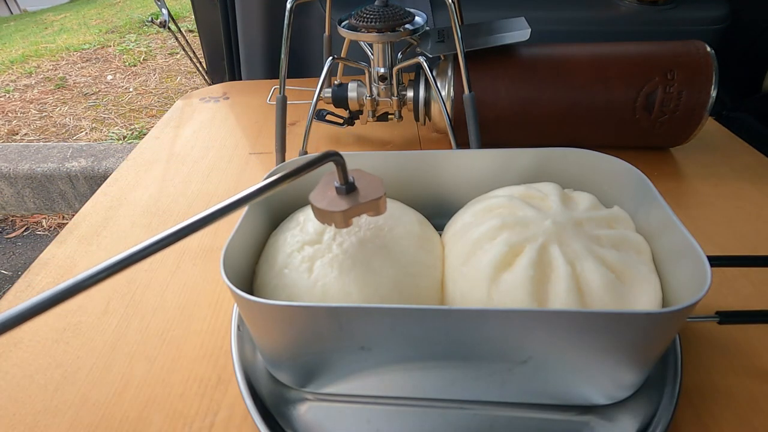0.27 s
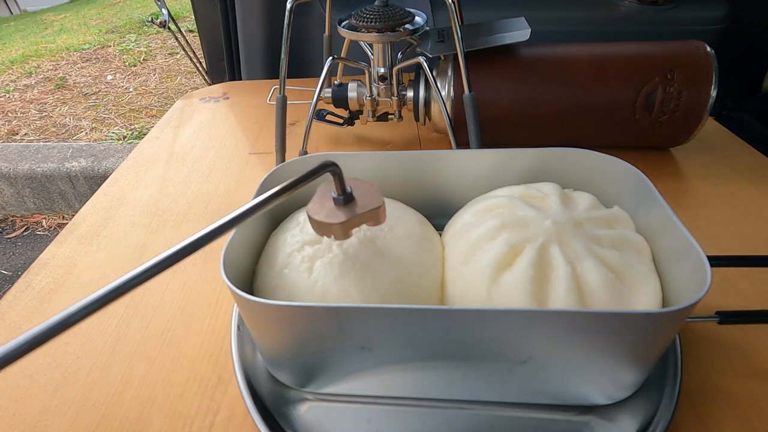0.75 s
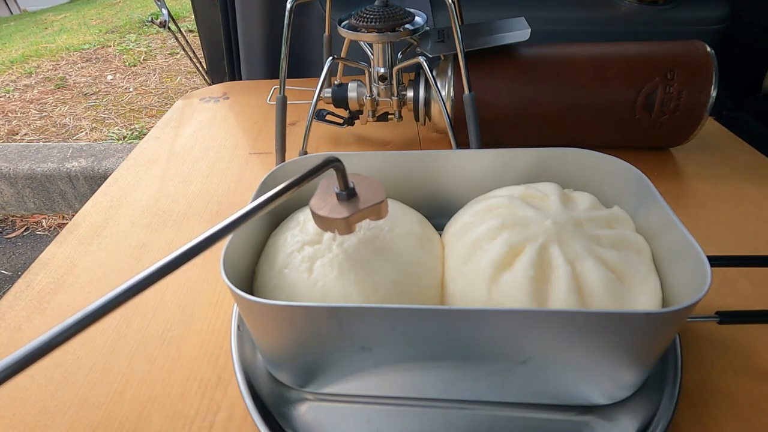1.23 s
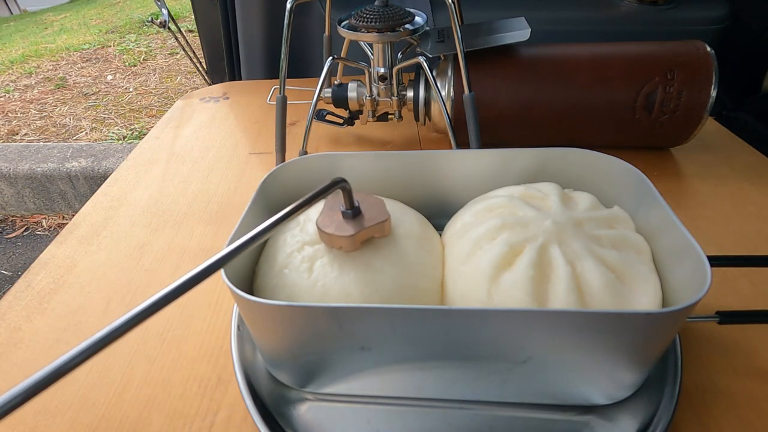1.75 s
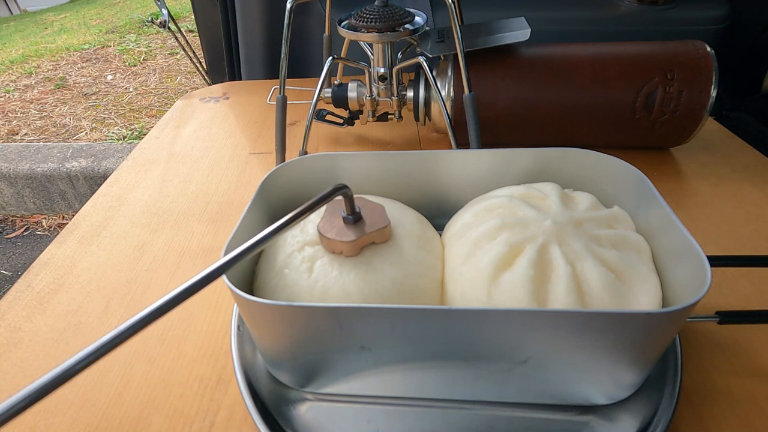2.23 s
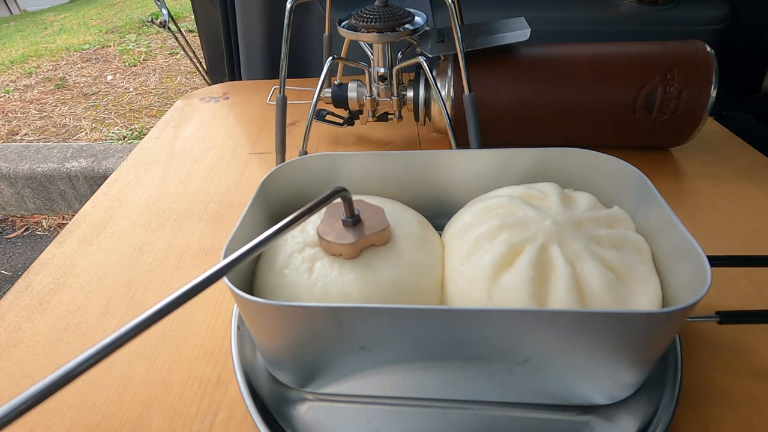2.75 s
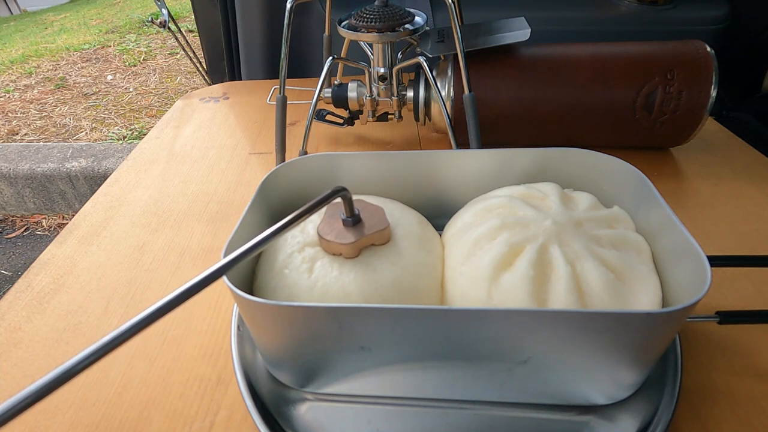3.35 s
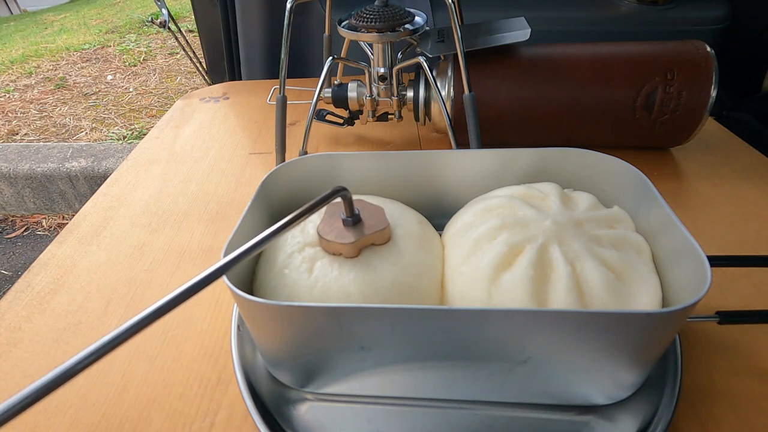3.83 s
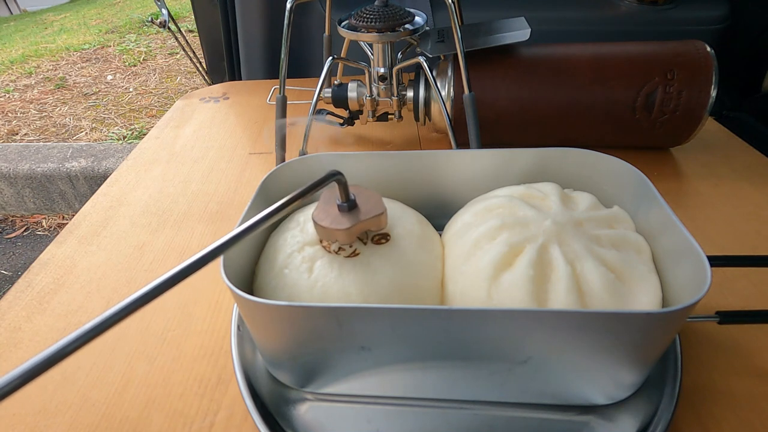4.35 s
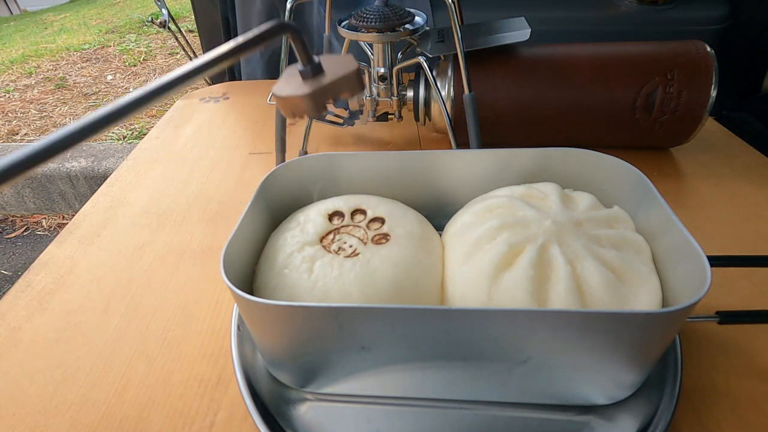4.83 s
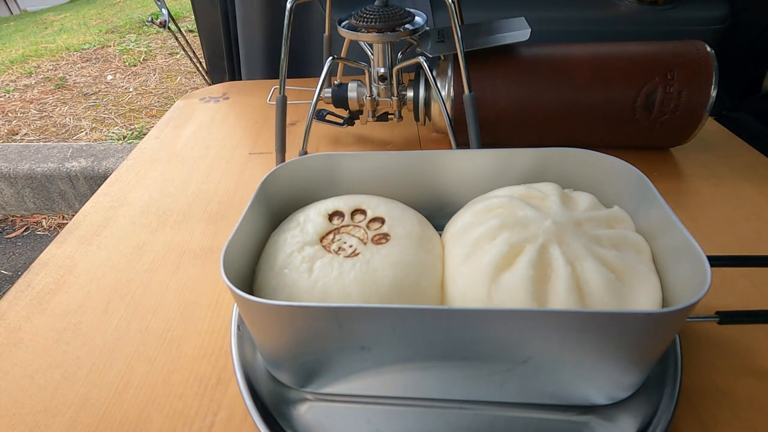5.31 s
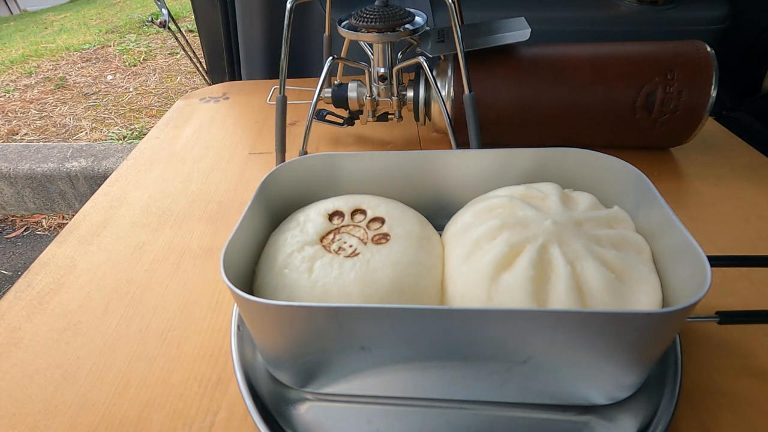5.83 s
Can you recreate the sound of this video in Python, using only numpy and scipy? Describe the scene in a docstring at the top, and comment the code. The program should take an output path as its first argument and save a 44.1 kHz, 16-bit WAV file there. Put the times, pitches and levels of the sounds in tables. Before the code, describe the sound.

Outdoors, wind rumbles softly on the microphone. Close by, a hot branding iron touches a steamed bun and a dense, bright sizzle swells, full of tiny pops. It thins into uneven spurts and spits, then stops abruptly as the iron lifts. The wind carries on, with a faint bird whistling far off and a thin insect shrill behind it.

```python
"""Wind rumbles on the microphone, outdoors; far off a bird whistles and an insect shrills.
Close by, just left of centre, a hot branding iron is pressed onto a steamed bun in a tin.
Moisture flashes to steam under it: a dense fizz of tiny pops that thins into spurts as the
crust dries, and stops when the iron lifts. The bird sings again over the wind."""
import sys
import numpy as np
from scipy import signal
from scipy.fft import rfft, irfft, next_fast_len
from scipy.io import wavfile
from scipy.ndimage import uniform_filter1d

SR = 44100
rng = np.random.default_rng(int(sys.argv[2]) if len(sys.argv) > 2 else 0)


def int16_out(signal):
    """Quantize to a 16-bit WAV file."""
    q = np.round(np.clip(np.atleast_2d(signal).T, -1, 1) * 32767)
    wavfile.write(sys.argv[1], SR, q.astype(np.int16))


N = 267687
TIME = np.arange(N) / SR
FFT_SIZE = next_fast_len(N + 8192)
FREQS = np.maximum(np.fft.rfftfreq(FFT_SIZE, 1 / SR), 1)


def sizzle(sputter_db=5.5, sputter_hz=110, dry_snap_db=-16):
    """The bun, close to the microphone: moisture bursts into steam as ticks, puffs and fine spray."""
    flow = from_db(boil_db() + sputter_db * dryness() * drift(sputter_hz))   # drier skin boils unevenly
    pops = droplets()
    snaps = np.sign(pops) * np.abs(pops) ** 0.54   # the same pops, more alike in size
    boiling = bursts(burst_rate(), spread_db=8.5)
    spray = searing_spray(flow, snaps)
    treble = pocket_ticks(boiling * flow + pops * from_db(6.3)) + spray
    treble += pops * dryness() * from_db(dry_snap_db)   # droplets snap more brightly on a dry crust
    body = steam_puffs(boiling, flow, snaps) + touch_and_spits()
    # tin and table throw the bursts back
    return from_the_left(scatter(treble, t60=0.04, wet_db=-15.5)) + scatter(body, t60=0.03, wet_db=-8)


# The boil builds as the iron is pressed home, ebbs as the crust dries, ends at the lift: t/s, level/dB
BOIL_LEVEL = [(1.862, -58), (2.0, -51.5), (2.12, -43), (2.199, -37.5), (2.43, -32.5), (3.0, -36.5),
              (3.638, -40), (3.8, -45.5), (4.165, -43.5), (4.222, -72)]
# Trapped steam escaping round the rim: t/s, level/dB
RIM_SPURTS = [(2.045, -43.5), (2.295, -38), (2.716, -37), (2.82, -38), (2.858, -43), (3.005, -34),
              (3.08, -33), (3.153, -39.5), (3.374, -43), (3.472, -34.5), (3.59, -40), (3.625, -38),
              (3.66, -35), (3.768, -41), (3.859, -37.5), (4.02, -48), (4.147, -40)]
# Brief stalls of the boil: t/s, dip/dB
BOIL_STALLS = [(2.122, -8), (2.582, -9), (2.77, -8), (2.967, -6), (3.063, -14), (3.19, -6), (3.241, -15),
               (3.4, -6.5), (3.505, -1), (3.56, -3), (3.738, -3), (3.811, -6), (3.94, -3), (3.98, -4),
               (4.089, -3)]

def boil_db(spurt_s=0.012, stall_s=0.0086):
    """Level of the boil while the iron touches, with its spurts and stalls."""
    touching = (TIME > BOIL_LEVEL[0][0]) & (TIME < BOIL_LEVEL[-1][0])
    level_db = 20 * np.log10(with_surges(in_time(BOIL_LEVEL)[0], RIM_SPURTS, spurt_s))
    dips_db = sum(db * bell(s, stall_s) for s, db in BOIL_STALLS)
    return np.where(touching, level_db + dips_db, -200)


# Tiny bursts on the wet skin, thinning as it dries: t/s, rate/(1/s)
BURST_RATE = [(1.85, 600), (2.3, 4600), (2.75, 2680), (3.1, 1730), (3.7, 1050), (4.2, 700)]

def burst_rate():
    """Bursts per second under the iron."""
    return in_time(BURST_RATE)[0]


def wetness():
    """The burst rate as a share of its peak."""
    return burst_rate() / burst_rate().max()


def dryness():
    """0 until the bursts are densest, then towards 1 as they thin out."""
    return (1 - wetness()) * (TIME > TIME[np.argmax(wetness())])


def bursts(per_s, spread_db):
    """Random clicks of uneven size; they share the available steam, so their power stays near 1."""
    born = rng.random(N) < per_s / SR
    size_db = spread_db * np.minimum(rng.standard_normal(N), 1.8)
    clicks = born * rng.choice([-1, 1], N) * from_db(size_db)
    local_power = np.abs(uniform_filter1d(clicks ** 2, size=900))
    return clicks / np.sqrt(local_power + 1e-3)


# The sharp tick of a burst, heard close: f/Hz, relative level/dB
TICK_SPECTRUM = [(1500, -48.5), (3800, -27), (5100, -5.5), (5750, -9.5), (6500, -0.5), (6850, -2),
                 (7400, 2.5), (8150, -5), (8750, -5), (9400, -11), (9850, -11.5), (11000, -26),
                 (12400, -28), (13000, -25), (14300, -27), (16500, -41)]

def pocket_ticks(clicks, low_hz=6300, high_hz=9500, ring_db=7.0, width_octaves=0.64, pockets=8):
    """Each burst rings briefly at the pitch of its own steam pocket."""
    pocket_of, ticks = rng.integers(0, pockets, N), np.zeros(N)
    for pocket, hz in enumerate(np.geomspace(low_hz, high_hz, pockets)):
        resonance_db = ring_db / (1 + (np.log2(FREQS / hz) / width_octaves) ** 2)
        ticks += coloured(clicks * (pocket_of == pocket), at_hz(TICK_SPECTRUM) + resonance_db)
    return ticks


# The softer puff of a burst's steam: f/Hz, relative level/dB
PUFF_SPECTRUM = [(200, -3), (450, 2), (830, -5), (1000, -3.5), (1450, 2.5), (1850, -2), (2500, 1.5),
                 (3300, 1), (4000, -1), (5300, 5), (8000, -25), (14000, -19.5)]

def steam_puffs(boiling, flow, snaps):
    """Steam leaves each burst; puffs grow more slowly than ticks, so they stand out in a gentle boil."""
    puffs = boiling * flow ** 0.74 * wetness() ** 0.037 * from_db(-19.5)
    return coloured(puffs + snaps * from_db(-22.5), at_hz(PUFF_SPECTRUM))


# The finest spray, right under the iron: f/Hz, relative level/dB
SPRAY_SPECTRUM = [(3500, -16.5), (4900, -9), (5800, -5), (6500, -1), (7300, -7.5), (8150, 0.5), (8800, 1),
                  (9400, 0), (9900, -2), (11100, -12.5), (12400, -14.5), (13000, -20), (14300, -16.5),
                  (16500, -55)]

def searing_spray(flow, snaps):
    """Metal sears the skin into a mist of tiny bursts, with a crack from each droplet."""
    mist = bursts(2 * burst_rate(), spread_db=6.0)
    spray = mist * flow ** 0.49 * wetness() ** 0.09 * from_db(-27.5)
    return coloured(spray + snaps * from_db(-12), at_hz(SPRAY_SPECTRUM))


# The loudest droplets bursting, from first touch to lift: t/s, relative level/dB
LOUD_DROPLETS = [(1.8697, -27), (1.9935, -30), (2.0412, -27), (2.1355, -25), (2.1843, -15), (2.192, -19),
                 (2.208, -17), (2.2829, -18), (2.2992, -16), (2.3243, -18), (2.3908, -15), (2.4112, -15),
                 (2.4392, -16), (2.465, -14), (2.4771, -17), (2.4834, -13), (2.525, -16), (2.5932, -17),
                  (2.6962, -13), (2.7152, -16), (2.7263, -15), (2.7378, -17), (2.8111, -16), (2.8173, -17),
                 (2.8407, -14), (2.8676, -14), (2.8902, -14), (2.9076, -15), (2.983, -16), (2.989, -11),
                 (3.0012, -16), (3.0118, -15), (3.0206, -12), (3.0406, -12), (3.0764, -19), (3.1088, -13),
                 (3.1135, -18), (3.1441, -13), (3.1655, -18), (3.2159, -17), (3.3117, -11), (3.3297, -18),
                 (3.369, -16), (3.382, -15), (3.4072, -19), (3.4267, -17), (3.4451, -18), (3.4648, -15),
                 (3.4771, -16), (3.4922, -14), (3.5186, -17), (3.5466, -14), (3.5708, -16), (3.578, -13),
                 (3.5872, -15), (3.5956, -15), (3.6175, -12), (3.6261, -15), (3.6371, -15), (3.6477, -19),
                 (3.6677, -15), (3.6978, -17), (3.7618, -17), (3.7667, -15), (3.7737, -17), (3.8284, -14),
                 (3.8373, -15), (3.8539, -18), (3.8635, -19), (3.8875, -20), (3.9157, -13), (3.9248, -17),
                 (3.9522, -18), (4.0019, -17), (4.013, -19), (4.0342, -20), (4.0563, -19), (4.0726, -21),
                 (4.1271, -22), (4.151, -21), (4.1656, -19), (4.2343, -31), (4.2631, -33)]

def droplets():
    """Each droplet cracks once, then gives two smaller ticks within two milliseconds."""
    clicks, sizes_db = np.zeros(N), np.array([0, -11, -15])
    delays_s = rng.uniform([0, .0005, .001], [0, .0009, .002], (300, 3))
    for (s, db), delay_s in zip(LOUD_DROPLETS + lesser_droplets(), delays_s):
        clicks[np.round((s + delay_s) * SR).astype(int)] += from_db(db + sizes_db)
    return clicks


def lesser_droplets(per_s=30, over_boil_db=12, dry_boost_db=4, spread_db=2):
    """Droplets at uneven intervals, further out of the boil as the skin dries: t/s, level/dB."""
    slots = np.arange(BOIL_LEVEL[0][0], BOIL_LEVEL[-1][0], 1 / per_s)
    lateness, strength = rng.random((256, 2))[:len(slots)].T
    s = slots + lateness / per_s
    db = np.interp(s, TIME, boil_db() + dry_boost_db * dryness()) + over_boil_db
    return list(zip(s, db + spread_db * (2 * strength - 1)))


# The iron's first tick on the skin, then wet spits: t/s, relative level/dB
TOUCH_AND_SPITS = [(1.8697, -40), (2.7243, -31), (3.0164, -31), (3.15, -28.5), (3.5258, -31),
                   (3.5462, -24.5), (4.1915, -45), (4.2343, -49)]
# Both are broad, with some body of the crust: f/Hz, relative level/dB
SPIT_SPECTRUM = [(250, -7), (1600, -1), (3200, -2), (5000, 0), (9500, -4), (15000, -20)]

def touch_and_spits(snap_db=13.5, decay_s=.0011):
    """Metal ticks on the skin, then the bun spits: each a snap and a splutter that dies quickly."""
    onsets = np.zeros(N)
    s, db = np.transpose(TOUCH_AND_SPITS)
    onsets[np.round(s * SR).astype(int)] = from_db(db)
    decay = signal.lfilter([1], [1, -np.exp(-1 / (decay_s * SR))], onsets + 1e-18)
    splutter = decay * rng.standard_normal(N)
    return from_db(-3) * coloured(from_db(snap_db) * onsets + splutter, at_hz(SPIT_SPECTRUM))


def from_the_left(stereo, lag_s=5.5e-6):
    """The bun lies just left of centre, so the right channel gets it a little later."""
    delay = np.exp(-2j * np.pi * FREQS * lag_s)
    right = irfft(rfft(stereo[1], FFT_SIZE) * delay, FFT_SIZE)[:N]
    return np.array([stereo[0], right])


# Slow gusts on the microphone: t/s, level/dB
GUSTS = [(0, -43.5), (.75, -37.5), (1.35, -43.5), (1.77, -38), (1.95, -43.5), (3.3, -43.5), (3.9, -45.5),
         (4.15, -44), (4.32, -36.5), (5.3, -40), (5.75, -42), (6.07, -43.5)]
# The strongest single eddies: t/s, level/dB
EDDY_THUMPS = [(.25, -37.5), (3.0, -35.5), (3.13, -35.5), (3.278, -35), (3.46, -36), (3.66, -39),
               (5.549, -34), (5.701, -30.5)]
# Rumble of the eddies: f/Hz, relative level/dB
EDDY_SPECTRUM = [(12, -32), (21, -1.5), (32, 5), (42, -5.5), (52, 6.5), (67, 5.5), (78, -9.5), (90, -8.5),
                 (101, 1), (115, -16.5), (200, -17), (400, -78), (3000, -110)]

def wind(thump_s=0.026):
    """Eddies thump on the microphone, rising and falling with the gusts."""
    eddies = stereo_noise(EDDY_SPECTRUM)
    local_rms = np.sqrt(uniform_filter1d(np.mean(eddies ** 2, axis=0), size=5000))
    return with_surges(in_time(GUSTS)[0], EDDY_THUMPS, thump_s) * eddies / local_rms


# A bird far off, one curve per whistle: t/s, f/Hz, level/dB
BIRD_WHISTLES = [
    [(.285, 3180, -71), (.312, 3640, -65), (.345, 3600, -70)],
    [(.565, 4200, -78), (.635, 4950, -73)],
    [(4.42, 4000, -63), (4.475, 4130, -66), (4.51, 4200, -71), (4.58, 4100, -67), (4.62, 4230, -67),
     (4.65, 4050, -64), (4.72, 4030, -65), (4.825, 4180, -64), (4.868, 3590, -64)],
    [(4.96, 3920, -63), (5.0, 4170, -64), (5.045, 4470, -72), (5.1, 3970, -68), (5.125, 4320, -65),
     (5.17, 4100, -66), (5.203, 3560, -62)],
    [(5.51, 4050, -66), (5.55, 4220, -66), (5.62, 4340, -70), (5.755, 4290, -64.5), (5.8, 4040, -62),
     (5.845, 4060, -61), (5.893, 3830, -69)],
]
# Short falling chips between the whistles: t/s, starting f/Hz, level/dB
BIRD_CHIPS = [(4.893, 5250, -69), (5.235, 5630, -70)]
# Twice the whistle breaks into a rough warble: t/s, depth/Hz; then the width of each
WARBLES, WARBLE_S = [(4.535, 90), (5.048, 100)], .03

def bird(held_hz=4050, chip_s=.03, fall_hz_per_s=24000, fade_s=0.0035, flutter_db=2.5):
    """A far whistle with its echo, quavering more as the bird pushes above its held note."""
    quaver, song = drift(170), np.zeros(N)
    warble_hz = sum(depth * bell(s, WARBLE_S) for s, depth in WARBLES)
    chips = [[(s, hz, db), (s + chip_s, hz - fall_hz_per_s * chip_s, db)] for s, hz, db in BIRD_CHIPS]
    for note in BIRD_WHISTLES + chips:
        hz, db = in_time(note)
        depth_hz = 19 + .13 * np.clip(hz - held_hz, 0, held_hz / 10) + warble_hz
        gate = np.clip(np.minimum(TIME - note[0][0], note[-1][0] - TIME) / fade_s, 0, 1)
        song += gate * from_db(db) * tone(hz + depth_hz * quaver)
    return scatter(song * from_db(flutter_db * drift(45)), t60=0.39, wet_db=-4.5)


# An insect in the distance, slowly growing louder: t/s, f/Hz, level/dB
INSECT_SHRILL = [(0, 5780, -86), (1.8, 6030, -74.5), (4.3, 6020, -73.5), (6.07, 6110, -68.5)]

def insect(waver=0.0037, rasp=0.0091, flutter_db=2.5):
    """A thin, far shrill with a wandering, slightly rasping pitch."""
    hz, db = in_time(INSECT_SHRILL)
    shrill = tone(hz * (1 + waver * drift(10) + rasp * drift(150)))
    return shrill * from_db(db + flutter_db * drift(30))


# Distant outdoor wash: f/Hz, relative level/dB
WASH_SPECTRUM = [(60, -5.5), (130, 0), (165, -1), (210, -5.5), (280, -4.5), (340, -13), (640, -16),
                 (830, -21), (960, -18), (1600, -22.5), (2500, -26.5), (3200, -34.5), (4000, -32.5),
                 (5600, -44), (12000, -81)]
# The wash sits right in the bass, mostly left above: f/Hz, left minus right/dB
WASH_BALANCE = [(60, -7), (110, -0.5), (200, 0.5), (380, 1.5), (700, 4.5), (1290, 4.5), (2380, 3.5),
                (4400, 3), (8120, -2), (15000, 3)]
# High hiss of the air: f/Hz, relative level/dB
HISS_SPECTRUM = [(4000, -8), (5800, -7), (6300, -1), (6680, 4.5), (7030, -2), (7180, -11), (7450, 0),
                 (7820, -3.5), (7990, -8.5), (8250, -9.5), (8400, -7.5), (8730, -7.5), (8950, -18),
                 (9300, -16.5), (10000, -23.5), (11000, -43)]
# The ambience all round: t/s, wash level/dB, hiss level/dB
AMBIENCE_LEVELS = [(0, -45.5, -66), (1.8, -45, -62.5), (4.3, -46.5, -61.5), (6.07, -45, -60)]

def outdoors():
    """Open air behind everything: a dull far wash and a thin high hiss."""
    wash_db, hiss_db = in_time(AMBIENCE_LEVELS)
    lean = from_db(at_hz(WASH_BALANCE) * [[.5], [-.5]])
    wash = irfft(rfft(stereo_noise(WASH_SPECTRUM), FFT_SIZE) * lean, FFT_SIZE)[:, :N]
    return from_db(wash_db) * wash + from_db(hiss_db) * stereo_noise(HISS_SPECTRUM)


# Likeness of the air at the microphone's two sides: f/Hz, correlation
CHANNEL_LIKENESS = [(60, 1), (150, 1), (350, 0.97), (700, 0.77), (1100, 0.62), (2500, 0.77), (4500, 0.77),
                    (7000, 0.93), (10000, 0.96)]

def stereo_noise(spectrum):
    """Coloured noise of rms 1, alike on both sides in the bass and widest in the midrange."""
    mid, side = rfft(rng.standard_normal((2, FFT_SIZE))) * from_db(at_hz(spectrum))
    alike = at_hz(CHANNEL_LIKENESS)
    left_right = np.sqrt(1 + alike) * mid + np.sqrt(1 - alike) * side * [[1], [-1]]
    return rms_one(irfft(left_right, FFT_SIZE)[:, :N])


def scatter(x, t60, wet_db, gap_s=0.0035):
    """Direct sound plus a dying spray of reflections, different on each side."""
    age = TIME[:SR // 2]
    tail = rng.standard_normal((2, len(age))) * from_db(-60 * age / t60) * (age > gap_s)
    tail /= np.linalg.norm(tail, axis=1, keepdims=True)
    return x + from_db(wet_db) * signal.fftconvolve(x[None], tail, axes=1)[:, :N]


def coloured(clicks, spectrum_db, size=512):
    """Turn each click into the shortest causal pulse with this spectrum, keeping its energy."""
    gain = from_db(np.interp(np.fft.rfftfreq(size, 1 / SR), FREQS, spectrum_db))
    cepstrum = irfft(np.log(gain))
    pulse = irfft(np.exp(rfft(2 * cepstrum[:size // 2], size)))
    return signal.oaconvolve(clicks, pulse / np.linalg.norm(pulse))[:N]


def with_surges(level_db, surges, width_s):
    """Amplitude of a flow with short surges on top of its level."""
    surge_power = sum(from_db(db) ** 2 * bell(s, width_s) for s, db in surges)
    return np.sqrt(from_db(level_db) ** 2 + surge_power)


def bell(s, width_s):
    """A smooth bump of height 1 around a moment."""
    return np.exp(-np.minimum(((TIME - s) / width_s) ** 2, 60))


def tone(hz):
    """A sine of rms 1 that follows a pitch curve."""
    return np.sqrt(2) * np.sin(2 * np.pi * np.cumsum(hz) / SR)


def drift(hz):
    """Random wander of rms 1, mostly slower than hz."""
    spectrum = rfft(rng.standard_normal(FFT_SIZE)) / (1 + (FREQS / hz) ** 2)
    return rms_one(irfft(spectrum, FFT_SIZE)[:N])


def in_time(rows):
    """The columns of a curve at every sample."""
    s, *columns = np.transpose(rows)
    return [np.interp(TIME, s, column) for column in columns]


def at_hz(points):
    """A spectrum table read along log frequency."""
    hz, value = np.transpose(points)
    return np.interp(np.log(FREQS), np.log(hz), value)


def from_db(db):
    """Decibels to gain."""
    return 10 ** (np.asarray(db) / 20)


def rms_one(x):
    """Scale to unit power."""
    return x / np.sqrt(np.mean(x ** 2) + 1e-20)


def scene():
    """The iron close by, wind on the microphone, the open air beyond."""
    return sizzle() + wind() + outdoors() + bird() + insect()


def record(dry, cutoff_hz=16400):
    """The top of the treble is cut steeply."""
    return signal.sosfilt(signal.ellip(10, .1, 80, cutoff_hz, fs=SR, output="sos"), dry)


dry = scene()
out = record(dry)
int16_out(out)
```